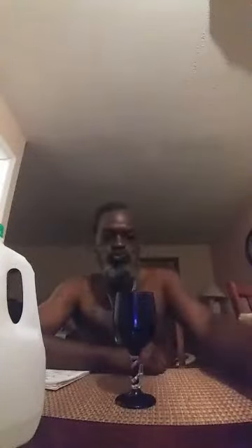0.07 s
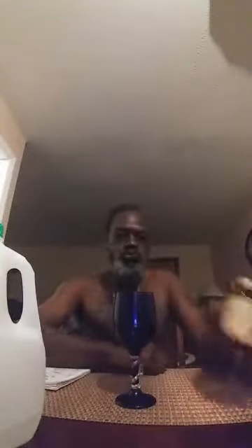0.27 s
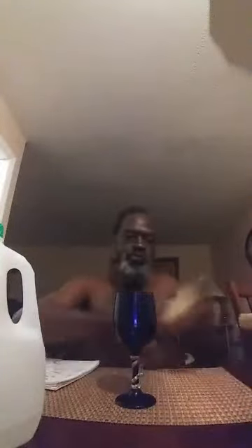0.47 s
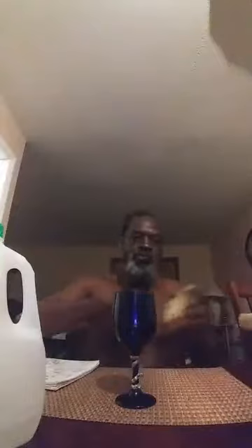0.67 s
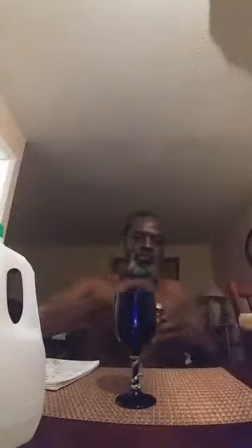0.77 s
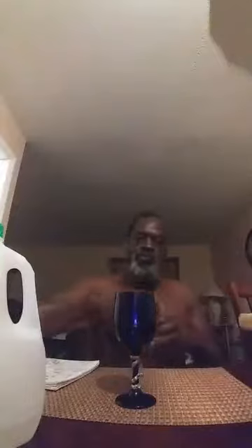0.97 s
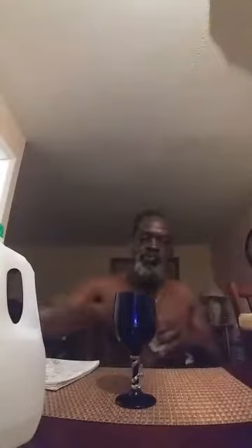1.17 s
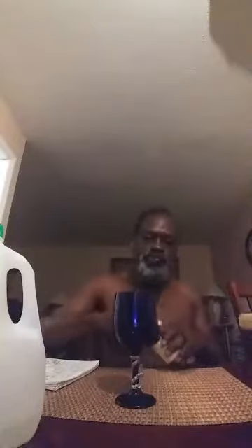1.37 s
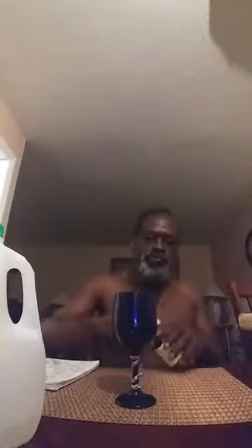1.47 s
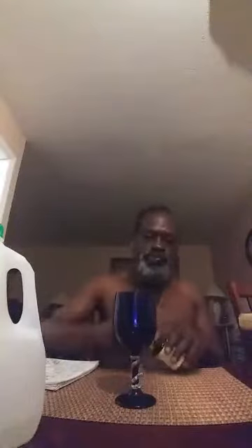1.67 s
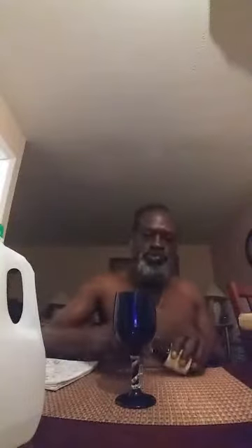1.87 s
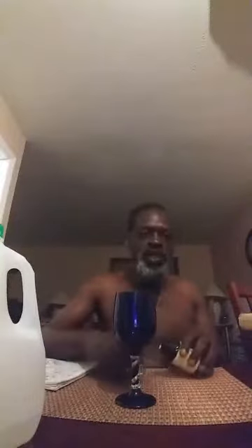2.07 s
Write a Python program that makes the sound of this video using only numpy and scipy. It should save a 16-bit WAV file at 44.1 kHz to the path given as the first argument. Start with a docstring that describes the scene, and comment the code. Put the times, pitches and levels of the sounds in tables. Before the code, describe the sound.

Pills rattle in a small plastic bottle in bright, clicking bursts, slide briefly along its wall, rattle again, then the base knocks dully on a table mat; close microphone, quiet small room.

```python
"""A small plastic bottle of pills, heard close by, is picked up, tipped about and set down on a table.
The pills tumble in clumps of clicks; the wall rings high in dying modes and the hollow rings lower.
Once they slide along the wall, made of gritty noise; at the end the base knocks on a mat on the table.
Dry taps and a brushing arm come from the handling. The quiet room adds shifting echoes of all of these,
shaped noise and a faint, wavering hum."""
import sys
import numpy as np
from scipy import signal
from scipy.fft import rfft, irfft
from scipy.io import wavfile

SR = 44100
rng = np.random.default_rng(int(sys.argv[2]) if len(sys.argv) > 2 else 0)


def file_out(sig):
    """Save sig as 16-bit WAV at sys.argv[1]."""
    # one column per channel
    cols = np.atleast_2d(sig).T
    # limit, then scale
    lim = np.clip(cols, -1, 1)
    pcm = np.round(lim * 32767).astype(np.int16)
    wavfile.write(sys.argv[1], SR, pcm)


N = 92918

RING_S, STRIKE_S = .1, .005  # length computed for each blow; duration that sets its reference energy
CONTACT_RISE_S = 0.0005
MODE_SCATTER_DB, DETUNE = 3, 0.011  # spread of each mode's level and, as a share, of its pitch
PLACE_DB, PLACE_HZ = 4, 570  # colour of a place of contact: depth of a pill's peaks, width of all peaks
CLICK_S, CLICK_SCATTER_DB = 0.0011, 1.5  # one pill: decay of its click, spread of strength
FIRST_DB = -3  # the first pill of a clump only grazes
LIGHT_HZ = 935  # bass limit of a clump whose decay is CLICK_S; a longer, heavier one reaches lower
SPOT_DB, SPOT_WIDTH_HZ = 13, 420  # the struck spot favours the wall modes near its pitch
GRAIN_DB, CATCH_DB, CATCH_HZ = 4, 2, 200  # friction: unevenness of its grit, depth and rate of clumps
BRIGHTEN, BRIGHT_HZ = 0.68, 2974  # extra power of the level for treble above BRIGHT_HZ
KNOCK_RISE_S = 0.0015  # the mat cushions the base
TAP_DECAY_S, TAP_RISE_S = 0.0011, 0.0032
HUM_WAVER, HUM_WAVER_HZ = 0.3, 20.6
AIR_DB = -49
ROOM_DB, ROOM_GAP_S = -3, 0.0048  # diffuse tail: level, time it takes to build up
EARLY_DB, EARLY_S = -9, 0.014  # first reflections: total level, latest arrival
MOVE_S = .05  # the echoes change this often as the bottle moves
KNOCK_ROOM_DB, TAP_ROOM_DB = -3.5, -1  # sent to the room, relative to the direct sound
EDGE_HZ = 13850


def amp(db):
    """Decibels to gain."""
    return 10 ** (np.asarray(db) / 20)


def evened(x):
    """Scales to rms 1."""
    return x / np.sqrt(np.mean(x ** 2) + 1e-20)


def blow(x):
    """Scales to the energy of a sound of rms 1 that lasts STRIKE_S."""
    return x * np.sqrt(STRIKE_S * SR / (np.sum(x ** 2) + 1e-20))


def read(points, hz):
    """Reads a table on a log-frequency axis."""
    f, value = np.transpose(points)
    return np.interp(np.log(hz + 1), np.log(f + 1), value)


def add(mix, s, sound):
    """Mixes a sound in at s seconds."""
    part = mix[max(round(s * SR), 0):][:len(sound)]
    part += sound[:len(part)]


def colour(x, points, size=4096):
    """Causal (minimum-phase) filter of unit energy with the given spectrum."""
    log_gain = np.log(amp(read(points, abs(np.fft.fftfreq(size, 1 / SR)))))
    min_phase = np.exp(np.conj(signal.hilbert(log_gain)))
    response = np.fft.ifft(min_phase).real[:size // 2]
    return signal.fftconvolve(x, response / np.linalg.norm(response))[:len(x)]


def wander(count, rate):
    """Smooth random values of rms 1; rate in cycles per step."""
    smooth = np.exp(-(np.fft.rfftfreq(count) / rate) ** 2)
    return evened(irfft(rfft(rng.standard_normal(count)) * smooth, count))


def grit(count, grain_db):
    """Tiny contacts of very uneven size."""
    contacts, size = rng.standard_normal((2, count))
    return contacts * amp(grain_db * np.clip(size, -2, 2))


def click(t, decay, rise, place_db):
    """One hard contact: a noise burst with a colour of its own."""
    spectrum = rfft(rng.standard_normal(len(t)))
    peaks = wander(len(spectrum), SR / len(t) / PLACE_HZ / 2)
    noise = irfft(spectrum * amp(place_db * peaks), len(t))
    return blow(noise * np.exp(-t / decay) * (1 - np.exp(-t / rise)))


def ring(modes, t, rise):
    """Dying modes, a little different at each place of contact."""
    total = 0
    for hz, db, t60 in modes:
        decay = amp(db + MODE_SCATTER_DB * rng.standard_normal() - 60 * t / t60)
        mode_hz = hz * (1 + DETUNE * rng.standard_normal())
        total = total + decay * np.sin(2 * np.pi * (mode_hz * t + rng.random()))
    return blow(total * (1 - np.exp(-t / rise)))


def scrape(curve, spectrum):
    """Friction: grit that catches in clumps and brightens as it gets louder."""
    s, db = np.transpose(curve)
    level = amp(np.interp(np.arange(N) / SR, s, db, left=-np.inf, right=-np.inf))
    clumps = amp(CATCH_DB * wander(N, CATCH_HZ / SR))
    sound = colour(level * evened(clumps * grit(N, GRAIN_DB)), spectrum)
    low = signal.filtfilt(*signal.butter(2, BRIGHT_HZ, fs=SR), sound)
    return low + (sound - low) * (level / level.max()) ** BRIGHTEN


def background():
    """Steady room noise of a fixed spectrum, and an appliance hum whose lines waver in level and phase."""
    # Spectrum of the room noise. Each row: frequency in Hz, relative level in dB.
    air = [(25, -31), (62, 0), (95, -4), (200, -2.5), (560, -12), (850, -19), (1700, -27), (4500, -30),
           (9700, -27), (14000, -35.5)]
    # Lines of the hum. Each row: frequency in Hz, level in dB.
    hum = [(121, -58.5), (223, -53.5), (450, -61.5)]
    hz, t = np.fft.rfftfreq(N, 1 / SR), np.arange(N) / SR
    noise = irfft(rfft(rng.standard_normal(N)) * amp(read(air, hz)), N)
    out = amp(AIR_DB) * evened(noise)
    for line_hz, db in hum:
        waver = HUM_WAVER * (wander(N, HUM_WAVER_HZ / SR) + 1j * wander(N, HUM_WAVER_HZ / SR))
        line = ((1 + waver) * np.exp(2j * np.pi * line_hz * t)).real
        out += amp(db) * evened(line)
    return out


def echoes(size=256, count=12):
    """A few reflections from the table and things on it, with a short diffuse tail of decaying noise."""
    # How long the room rings on. Each row: frequency in Hz, time to fall by 60 dB in seconds.
    room_t60 = [(300, 0.39), (2000, 0.3), (12000, 0.2)]
    hz, t, z = signal.stft(rng.standard_normal(SR // 2), SR, nperseg=size)
    fading = z * amp(-60 * t / read(room_t60, hz)[:, None])
    tail = signal.istft(fading, SR, nperseg=size)[1]
    tail *= np.minimum(np.arange(len(tail)) / SR / ROOM_GAP_S, 1) ** 2
    echo = amp(ROOM_DB) * tail / np.linalg.norm(tail)
    at = (EARLY_S * SR * rng.uniform(1 / 10, 1, count)).astype(int)
    echo[at] += amp(EARLY_DB) * rng.choice([-1, 1], count) / np.sqrt(count)
    return echo


def room(x, count=5):
    """The moving bottle passes from one pattern of echoes to the next, in a repeating cycle."""
    place = np.arange(N) / SR / MOVE_S
    out = np.zeros(N)
    for k in range(count):
        # each pattern swells and fades over two moves, so neighbours cross-fade
        share = np.sin(np.pi / 2 * np.minimum((place - k) % count, 2))
        out += signal.fftconvolve(x * share, echoes())[:N]
    return out


def rustle():
    """An arm and hand brush along: soft friction noise."""
    # Strength of the brushing. Each row: time in seconds, level in dB before the treble is turned down.
    brushing = [(0, -52), (.1, -56), (.25, -92), (.92, -51.5), (1.1, -97)]
    # Spectrum of the brushing. Each row: frequency in Hz, relative level in dB.
    brush_colour = [(150, 0), (600, 3), (2000, -12), (12000, -15)]
    return scrape(brushing, brush_colour)


def taps():
    """Fingers and table tap the outside of the bottle: short dry clicks with no modes."""
    # The taps. Each row: start in seconds, level in dB ahead of the colouring.
    contacts = [(0.0633, -34.5), (1.7504, -35), (1.786, -24.5)]
    # Spectrum of the taps. Each row: frequency in Hz, relative level in dB.
    tap_colour = [(300, 4.5), (1500, 4), (2600, -5), (3600, -1.5), (10000, 6), (13500, 3)]
    t, out = np.arange(0, RING_S, 1 / SR), np.zeros(N)
    for s, db in contacts:
        add(out, s, amp(db) * click(t, TAP_DECAY_S, TAP_RISE_S, place_db=2.5))
    return colour(out, tap_colour)


def knocks():
    """The base lands on the mat and rocks; each dull knock has its own pitch, higher ones dying sooner."""
    # The base meets the table. Each row: start in seconds, level in dB, pitch as a share of the modes.
    landings = [(1.75, -27, 0.95), (1.772, -41.5, 1.28), (1.787, -46, 0.97)]
    # Modes of the table at pitch 1. Each row: frequency in Hz, relative level in dB,
    # time to fall by 60 dB in seconds.
    table_modes = [(463, 1.5, 0.053), (670, -11, 0.035), (1164, -16.5, 0.036)]
    t, out = np.arange(0, RING_S, 1 / SR), np.zeros(N)
    for s, db, pitch in landings:
        add(out, s, amp(db) * ring(table_modes, pitch * t, KNOCK_RISE_S))
    return out


def sliding():
    """Pills slide along the wall: friction noise that swells and fades."""
    # Strength of the slide. Each row: time in seconds, level in dB before the treble is turned down.
    slide = [(1.10, -63), (1.19, -37), (1.25, -35.5), (1.275, -33), (1.308, -25.5), (1.345, -48.5),
             (1.40, -77)]
    # Spectrum of the slide. Each row: frequency in Hz, relative level in dB.
    slide_colour = [(300, -5.5), (1200, -5), (1650, 6), (1900, -2.5), (2200, 4), (2550, -18), (3650, 0),
                    (5500, -10.5), (8400, 4.5), (10800, -4), (14000, -0.5)]
    return scrape(slide, slide_colour)


def clump(t, decay, count=10):
    """Pills land one after another, on the whole ever weaker; each clicks and sounds the hollow."""
    # Modes of the hollow. Each row: frequency in Hz, relative level in dB,
    # time to fall by 60 dB in seconds.
    hollow_modes = [(1825, 1, 0.015), (1970, 0.83, 0.041), (2101, -1.6, 0.024), (3630, 0.28, 0.024)]
    clicks, hollow = np.zeros((2, len(t)))
    for k in range(count):
        late = 2 * max(k + rng.random() - .5, 0) / count * (k > 0)  # in decay times
        scatter_db = FIRST_DB * (k == 0) + CLICK_SCATTER_DB * rng.standard_normal()
        strength = np.exp(-late) * amp(scatter_db)
        pill = click(t[:len(t) // 10], CLICK_S, CONTACT_RISE_S, PLACE_DB)
        add(clicks, late * decay, strength * pill)
        add(hollow, late * decay, strength * ring(hollow_modes, t[:len(t) // 2], CONTACT_RISE_S))
    return blow(clicks), blow(hollow)


def pills():
    """Each clump clatters, sounds the hollow and rings the wall in the modes of the spot it hits."""
    # Clumps striking the bottle. Each row: start in seconds, clatter in dB ahead of filtering,
    # wall ring in dB, hollow ring in dB, clatter decay in seconds, pitch the struck spot favours in Hz.
    strikes = [ (0.4471, -21, -34, -35, .0015, 9100), (0.4548, -27, -27, -28.5, .002, 11900),
               (0.4617, -20, -26, -43, 0.0043, 11800), (.4654, -22.5, -29, -41, 0.0028, 6400),
               (.476, -23.5, -48, -36.5, 0.013, 6400), (.494, -23.5, -42, -38, 0.015, 11800),
               (.530, -23, -34, -37.5, .018, 6400), (.553, -23.5, -34, -50, .002, 11800),
               (0.5559, -23.5, -24.5, -34.5, 0.0045, 11800), (0.561, -22, -25, -44, .0027, 11100),
               (.5759, -25.5, -25.5, -42, .007, 11700), (.667, -23.5, -26, -30.5, .009, 6400),
               (0.6761, -19.5, -17.5, -29, .003, 11800), (0.6851, -15.5, -21.5, -35.5, 0.0052, 11800),
               (.697, -32, -26, -33.5, 0.0076, 6400), (.707, -26, -31, -47, 0.0024, 10100),
               (.718, -30, -34, -45, .0045, 10100), (0.7678, -24, -28, -38, 0.0021, 6300),
               (.775, -31, -25, -49, 0.0027, 11800), (0.7861, -25.5, -28, -42.5, .006, 11240),
               (1.011, -29, -35, -50, 0.0045, 7700), (1.094, -22.5, -58, -37, 0.0039, 7700),
               (1.5023, -18, -17, -33, 0.0011, 12060), (1.512, -22, -29, -35, 0.007, 12000),
               (1.519, -20, -23.5, -26, .011, 7660), (1.533, -20, -21, -29.5, 0.0066, 11900),
               (1.567, -29, -43, -33, .009, 9100), (1.5777, -21, -36, -39.5, 0.0096, 9100),
               (1.6322, -18, -21, -32.5, 0.0027, 9300)]
    # Spectrum of the clatter. Each row: frequency in Hz, relative level in dB.
    clatter_colour = [(100, -1.5), (250, 4.5), (750, -4), (1300, -5), (2100, -12.5), (2500, -12),
                      (3050, -11), (3600, -5), (5000, -9), (6500, -2.5), (9500, 3), (12600, -10),
                      (14500, 3)]
    # Modes of the wall. Each row: frequency in Hz, relative level in dB ahead of the spot's boost,
    # time to fall by 60 dB in seconds.
    wall_modes = [(6407, -9.5, 0.036), (7720, -7, .028), (9180, -7.5, 0.037), (10160, -6, 0.029),
                  (12040, 0, 0.027), (11800, 1.5, 0.033)]
    t, clatter, rings = np.arange(0, RING_S, 1 / SR), np.zeros(N), np.zeros(N)
    for s, clatter_db, wall_db, hollow_db, decay, spot_hz in strikes:
        clicks, hollow = clump(t, decay)
        bass_cut = signal.butter(1, min(LIGHT_HZ * CLICK_S / decay, SR / 10), "high", fs=SR)
        struck = []
        for hz, db, t60 in wall_modes:
            nearness = np.exp(-((hz - spot_hz) / SPOT_WIDTH_HZ) ** 2)
            struck.append((hz, db + SPOT_DB * nearness, t60))
        wall = ring(struck, t, CONTACT_RISE_S)
        add(clatter, s, amp(clatter_db) * signal.lfilter(*bass_cut, clicks))
        add(rings, s, amp(wall_db) * wall + amp(hollow_db) * hollow)
    return colour(clatter, clatter_colour) + rings


def scene():
    """The bottle, the handling and the table, direct and echoed, over the background of the room."""
    bottle = pills() + sliding() + rustle()
    table, clicks = knocks(), taps()
    echo = room(bottle + amp(KNOCK_ROOM_DB) * table + amp(TAP_ROOM_DB) * clicks)
    return (bottle + table + clicks + echo + background())[None]


def record(dry):
    """The recorder's band limit: a steep low-pass at EDGE_HZ."""
    low_pass = signal.firwin(255, EDGE_HZ, window=("kaiser", 8), fs=SR)
    return signal.oaconvolve(dry, low_pass[None], "same")


dry = scene()
out = record(dry)
file_out(out)
```